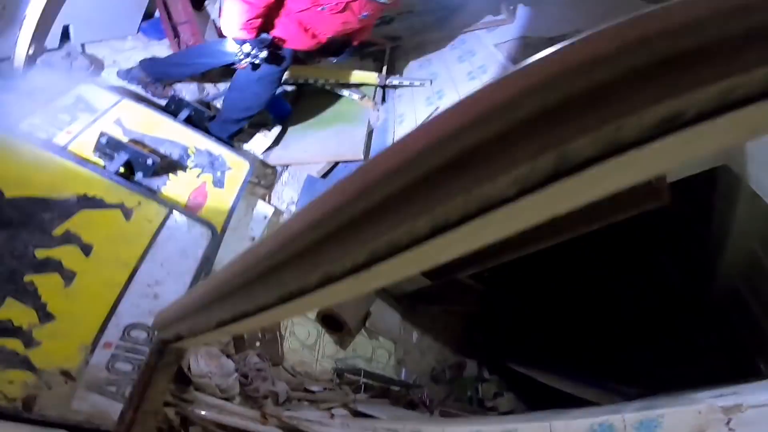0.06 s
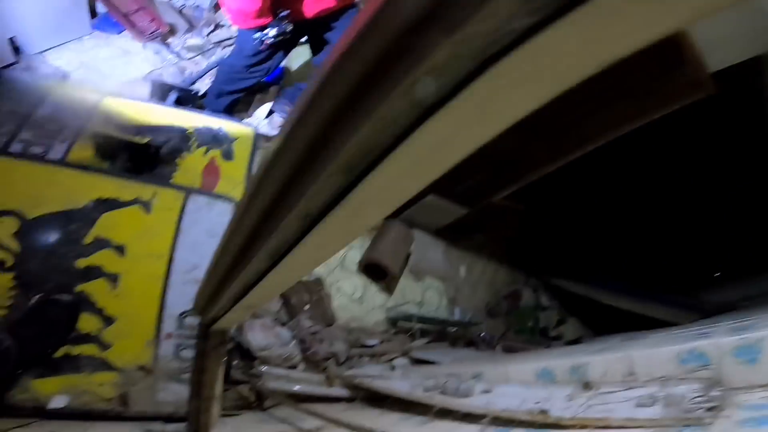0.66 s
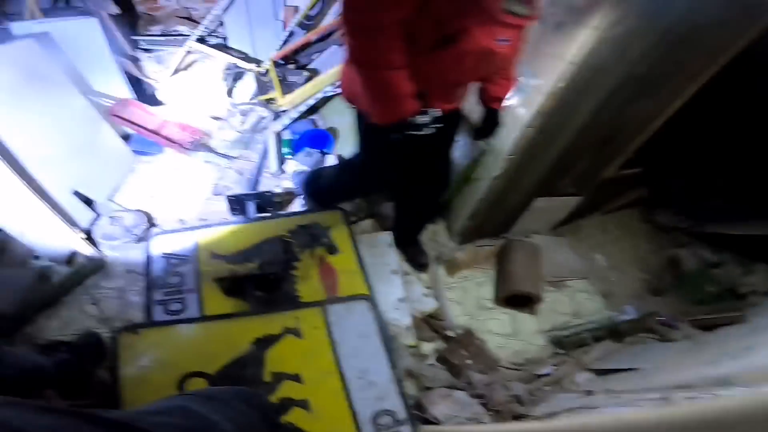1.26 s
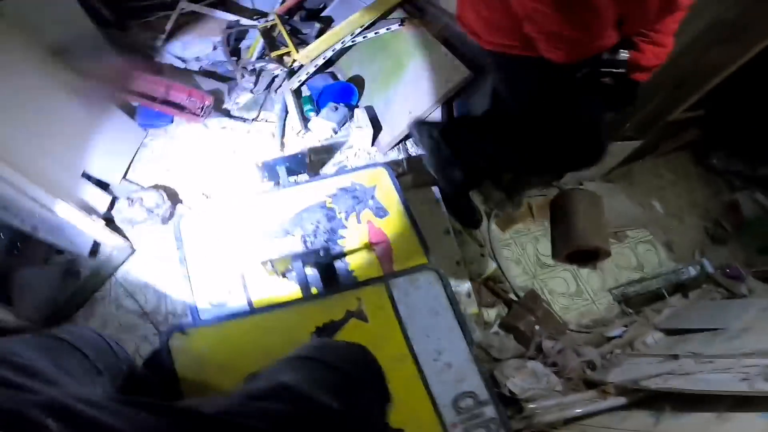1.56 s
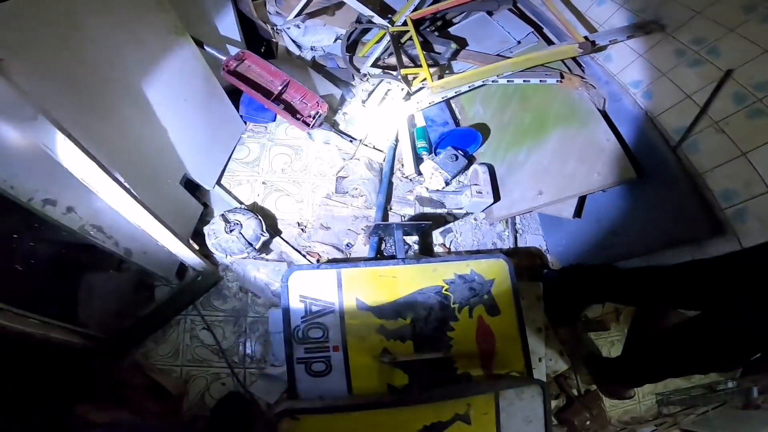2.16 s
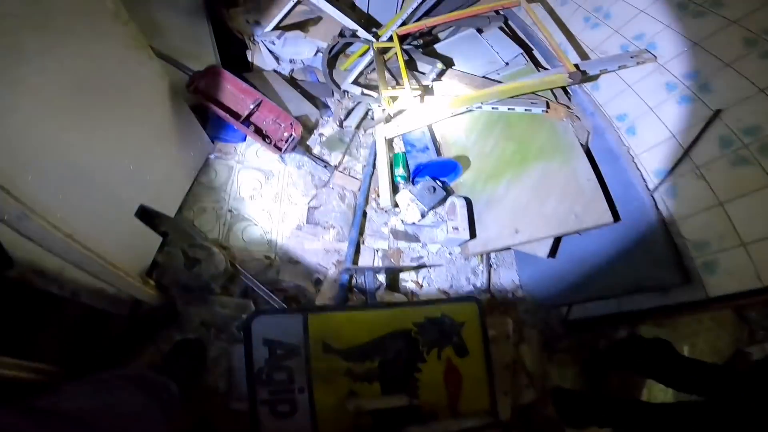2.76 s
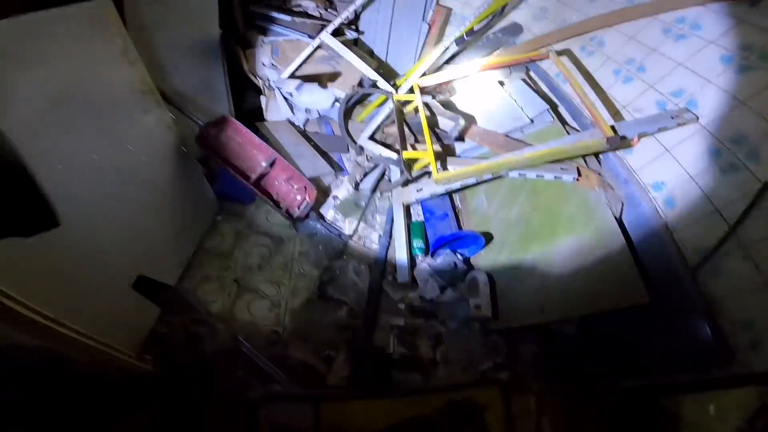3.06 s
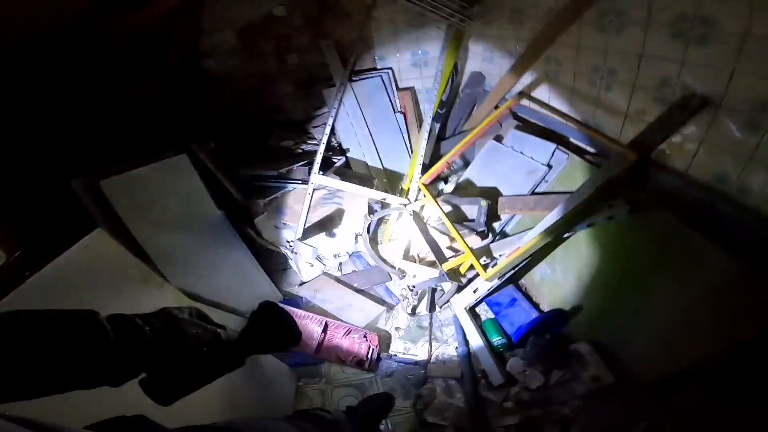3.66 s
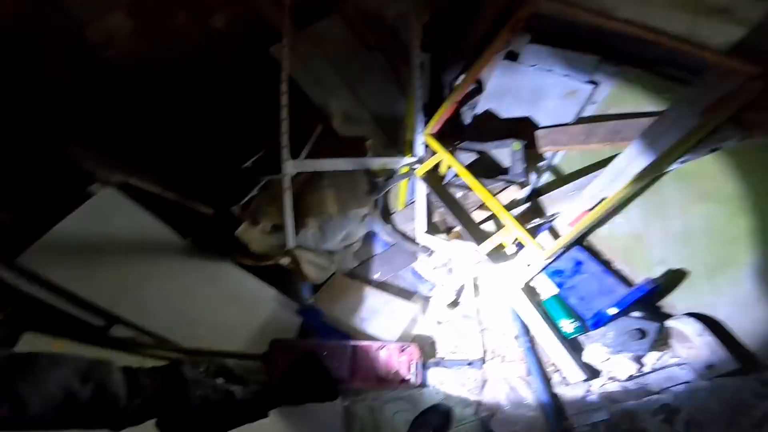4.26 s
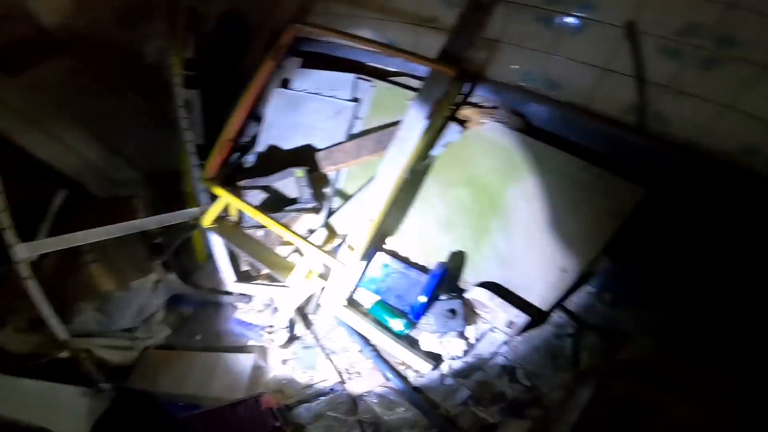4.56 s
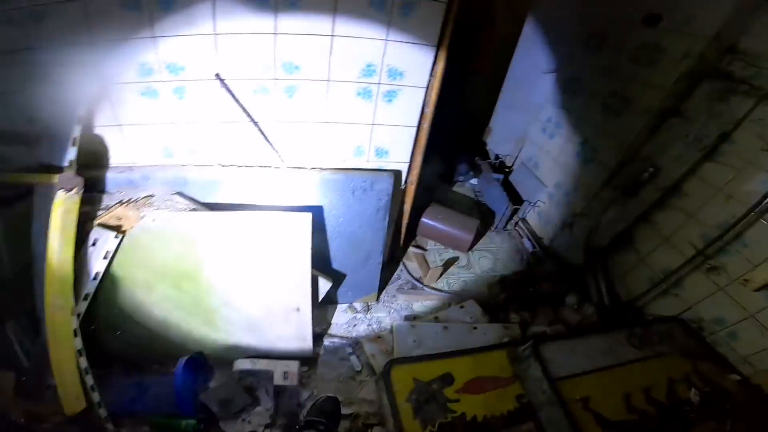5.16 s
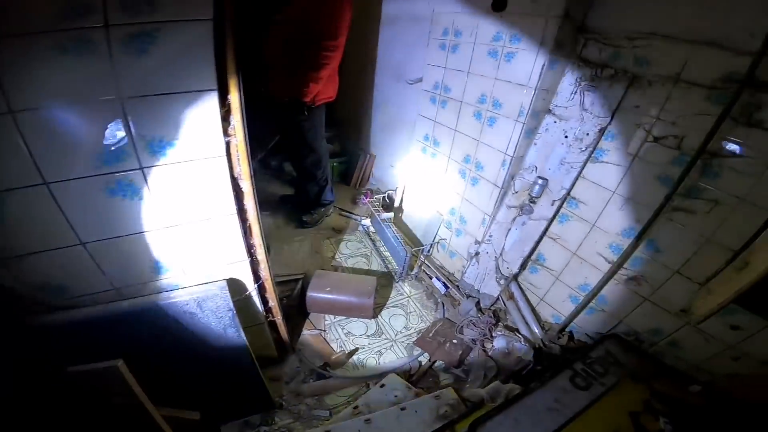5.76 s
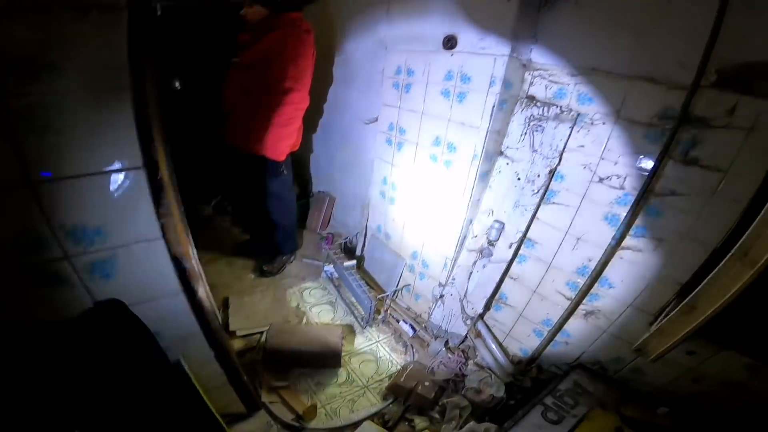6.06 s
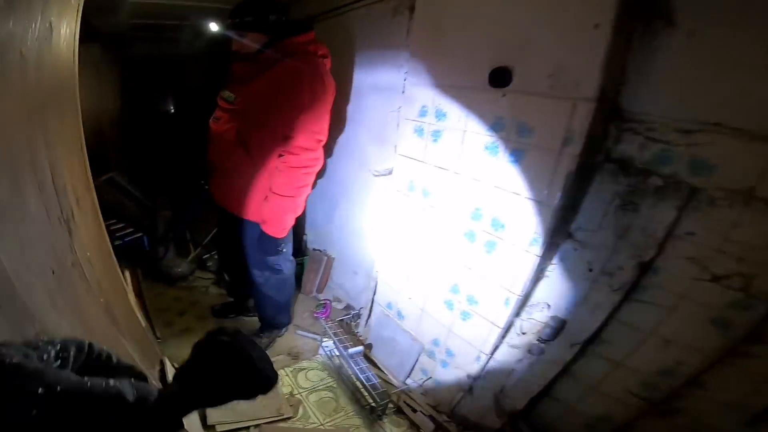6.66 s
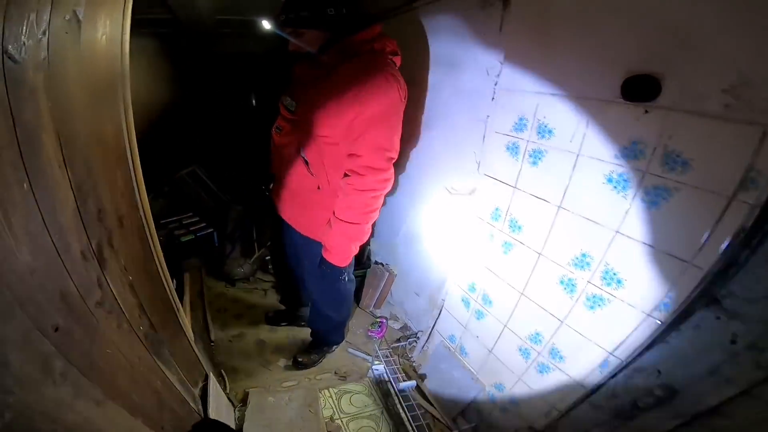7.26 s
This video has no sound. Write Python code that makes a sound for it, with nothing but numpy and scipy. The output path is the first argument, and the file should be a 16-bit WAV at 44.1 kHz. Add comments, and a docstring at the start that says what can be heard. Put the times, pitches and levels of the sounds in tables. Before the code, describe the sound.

Someone picks a way over rubbish in a small tiled room, heard from close by. Heavy steps on sheet metal come first, booming, rattling and grinding on grit. Softer knocks on boards and a swish of clothing follow. After a lull comes a quick run of loud, brittle cracks, then a short scrape and faint shuffling. The walls add a short echo.

```python
"""Someone picks a way over rubbish in a small tiled room of an abandoned building.
First, boots boom on loose sheet-metal signs, which ring and rattle while grit crunches underfoot.
From about 3 s the boots knock on boards, small bits crack and clothes swish. From 5.5 s brittle
debris snaps several times close by and the room booms faintly; then a piece scrapes along, and a
soft shuffle ends the walk. All the way through, the bare walls ring briefly over a steady hush."""
import sys
import numpy as np
from scipy import signal
from scipy.fft import rfft, irfft
from scipy.io import wavfile
from scipy.ndimage import uniform_filter1d

SR = 44100
rng = np.random.default_rng(int(sys.argv[2]) if len(sys.argv) > 2 else 0)


def to_wav(s):
    """Save 16-bit WAV."""
    ch = np.atleast_2d(s).T  # columns
    pcm = np.round(np.clip(ch, -1, 1) * 32767)  # PCM
    wavfile.write(sys.argv[1], SR, pcm.astype(np.int16))


N = 331058
T = np.arange(N) / SR
HIT = T[:SR]  # one second, the time axis of one blow

# boots landing on the metal sheets:
# (time [s], level [dB], pitch of the spot struck [Hz], rattle [dB], share of ring time left [0-1])
SHEET_STEPS = [(0.581, -7.5, 183, -6.5, 0.51), (0.598, -10, 111.5, -15, 0.7), (0.623, -8, 136, -29, 0.6),
               (0.674, -17.5, 120, -13, 0.91), (0.802, -14, 154.3, -11, 0.65),
               (0.849, -15.5, 96, -19, 0.34), (0.935, -27.5, 58.6, -8.5, 0.79),
               (0.984, -25, 127, -21, 0.89), (1.07, -28.5, 218, -22, 0.48), (1.146, -26, 157.4, -32, 0.66),
               (1.496, -30.5, 159, -7, 0.16), (1.608, -24, 120, -20, 0.52), (1.681, -8, 169.4, -27, 0.26),
               (1.6924, -16, 164, -12, 0.16), (1.738, -17.5, 125, -15, 0.35), (2.05, -25.5, 131, -6, 1),
               (2.155, -25, 148, -4, 0.4), (2.258, -23.5, 150, -5, 0.21), (2.46, -31.5, 138, -11, 0.43),
               (2.615, -36, 125, -20, 0.57)]
# the notes a sheet rings with: (pitch [Hz], level [dB], time to fade by 60 dB with no boot on it [s])
SHEET_NOTES = [(56, -6, 0.38), (78, -0.5, 0.77), (103.7, -2, 0.58), (124.4, -3, 0.38), (138.2, 2, 0.38),
               (149.8, -7.5, 0.87), (170.9, -2, 0.6), (211, -5.5, 0.59), (252.8, -7, 0.7), (351, -14, 0.98),
               (594.3, -8, 0.55), (902, -9, 0.26), (1244, -24, 0.28)]
# tone of the rattling sheet edges: (frequency [Hz], level [dB])
RATTLE_TONE = [(150, 4), (300, 4.5), (600, -4), (1400, -5), (2200, -23.5), (3800, -11.5), (6500, -50.5),
               (15000, -90)]
# brittle pieces snapping: (time [s], level [dB], pitch [Hz], sharp edge [dB], sent to the walls [dB])
DEBRIS_SNAPS = [(0.363, -38.5, 985, -9, -2), (0.5997, -14, 1290, -12, -1), (0.8233, -20.5, 2330, -2, -5),
                (1.0832, -33, 1680, 3, -4), (1.209, -40, 1170, 20, -1), (1.2921, -25, 1600, -42, 7.5),
                (1.342, -27, 2180, -19, 1), (1.349, -20, 1800, -32, 3.5), (1.392, -18.5, 2900, -8, -7),
                (1.4027, -20, 2550, -22, -20), (1.492, -31, 2570, -25, -20), (1.6747, -25.5, 1046, -6, -1),
                (1.949, -34.5, 2200, 13, -14), (2.2454, -23, 2480, 3, 2.5), (2.3342, -28.5, 1620, -2, 8),
                (2.4584, -28.5, 1480, -4, -3), (2.541, -34, 1750, -3, 1), (2.65, -44.5, 2200, 11, 10.5),
                (2.901, -24, 1450, -22, 0.5), (2.9069, -25.5, 1120, -16, 0),
                (2.9183, -22.5, 1280, -22, -17), (2.929, -27.5, 2000, 8, -14), (2.9485, -27, 2230, -19, -4),
                (2.9743, -26, 1840, 2, -1), (3.049, -27.5, 1800, -1, 1.5), (3.1303, -31.5, 1530, -11, -1),
                (3.139, -38, 1720, -23, 3.5), (3.467, -44.5, 1355, -7, 0), (3.55, -41, 2580, -31, 0),
                (3.667, -27.5, 4450, -3, -14), (3.868, -31, 2160, -9, -3.5), (4.1995, -34, 4280, 16, 2.5),
                (4.247, -39, 1210, -6, -10), (5.4993, -11.5, 5570, 2, -3), (5.5636, -21, 1480, -19, 0),
                (5.58, -20, 2010, -5, -13), (5.5874, -11.5, 1840, -17, -6), (5.6027, -16.5, 1780, -20, -8),
                (5.6633, -21, 1960, -1, -10), (5.6936, -19.5, 1810, -12, -7), (5.7112, -23, 1840, -18, -10),
                (5.732, -9, 1890, -14, -7.5), (5.8509, -9.5, 1990, -10.5, -10.5),
                (5.8586, -23, 2190, -10, -1.5), (5.9945, -20.5, 1930, -10, -7.5),
                (6.085, -20, 2380, -8, -2), (6.118, -11, 2290, -8.5, -8.5), (6.2203, -11, 2170, -11.5, -2),
                (6.255, -12.5, 2290, -9, -6), (6.3284, -26.5, 2280, -12, -33),
                (6.521, -28.5, 1430, -33, 3.5), (6.586, -25.5, 2050, -21, 1), (6.6118, -18, 2120, -8, 3.5),
                (6.616, -12, 2280, -10, -12)]
# tone of a snap's sharp edge: (frequency [Hz], level [dB])
EDGE_TONE = [(100, -29), (190, -32), (350, -21), (600, -12), (1300, 9), (3000, 10.5), (4500, 13),
             (6300, -1.5), (7700, 1), (10000, -17.5), (12500, -10.5), (16000, -15)]
# boots knocking on boards, except the last two rows, the room's low boom after a loud snap:
# (time [s], level [dB], pitch [Hz], clack against the note [dB])
DULL_THUDS = [(0.207, -46, 427, 7.5), (0.363, -44, 352, 12), (0.373, -26.5, 105, -33),
              (1.319, -36.5, 390, 8), (1.675, -28.5, 418, 8.5), (1.936, -40, 446, 12), (2.903, -42, 440, 3),
              (3.058, -45.5, 112, 9), (3.122, -48, 155, 3), (3.694, -39, 72, -9), (3.74, -35.5, 173, 5.5),
              (3.82, -33, 179, 0.5), (3.828, -28, 98, -17), (3.914, -45, 174, 4.5),
              (3.993, -42.5, 94, -3.5), (4.929, -42.5, 232, 6), (4.947, -41.5, 213, 3),
              (4.957, -41.5, 86.5, -11), (6.123, -38.5, 178, 0.5), (6.232, -39.5, 176, -12)]
# tone of a thud's clack: (frequency [Hz], level [dB])
CLACK_TONE = [(40, -38), (100, 0.5), (220, 8), (480, 3), (650, -2), (900, -13.5), (2500, -20), (12000, -80)]
# a piece is nudged, dragged and let go: (time of full weight [s], rise [s], hold [s], level [dB])
PIECE_DRAGS = [(6.525, 0.021, 0.0033, -40), (6.615, 0.031, 0.0074, -31), (6.678, 0.067, 0.088, -27),
               (6.832, 0.008, 0.0063, -37.5)]
# tone of its scrape: (frequency [Hz], level [dB])
SCRAPE_TONE = [(65, -78), (110, -29), (200, -0.5), (314, -14.5), (355, -5), (455, -14.5), (658, -4),
               (843, -9), (915, -11), (1060, -5.5), (1880, -3), (3210, -9), (4940, -9), (6870, -15.5),
               (15000, -40.5)]
# weight shifts on the sheets: (time of full weight [s], rise [s], hold [s], level [dB])
WEIGHT_SHIFTS = [(1.1, 0.16, 0.62, -46), (1.5, 0.22, 0.0055, -36.5), (1.63, 0.054, 0.24, -38.5),
                 (1.95, 0.028, 0.0041, -35.5), (2.07, 0.19, 0.29, -37), (2.255, 0.033, 0.05, -35),
                 (2.465, 0.017, 0.0051, -40), (2.62, 0.035, 0.15, -58.5)]
# tone of the sheets grinding on rubble: (frequency [Hz], level [dB])
GRIND_TONE = [(35, -13), (125, 10.5), (300, 9.5), (600, 4), (1000, 5.5), (1800, -14.5), (4000, -76)]
# a sole presses on grit: (time of full weight [s], rise [s], hold [s], level [dB], splinters [dB])
GRIT_TREADS = [(0.01, 0.11, 0.077, -43.5, -10), (0.13, 0.035, 0.029, -41, -9.5),
               (0.215, 0.048, 0.087, -41.5, -11), (0.39, .03, 0.13, -55.5, -9),
               (0.6, 0.037, 0.13, -29.5, -13), (0.815, 0.077, 0.0076, -32, -12.5),
               (1.085, 0.022, 0.01, -41, -17), (1.215, 0.072, 0.025, -45, -14),
               (1.295, 0.059, 0.15, -41, -16.5), (1.46, 0.038, 0.041, -42, -14.5),
               (1.56, 0.017, 0.027, -38, -15.5), (1.652, 0.067, 0.0069, -35.5, -12.5),
               (1.77, 0.032, 0.11, -41.5, -22), (1.95, 0.065, 0.036, -42.5, -8),
               (2.11, 0.098, 0.13, -38.5, -14), (2.25, 0.054, 0.12, -38, -14.5),
               (2.465, 0.014, 0.029, -43, -12), (2.58, 0.017, 0.022, -50.5, -11),
               (2.66, .01, 0.16, -52, -8.5), (2.905, 0.02, 0.05, -39, -8.5),
               (3.053, 0.008, 0.011, -38.5, -11), (3.315, 0.072, 0.016, -48.5, -11),
               (3.555, 0.018, 0.0098, -53.5, -11), (3.67, 0.12, 0.12, -51, -6.5),
               (3.83, 0.05, 0.0059, -40.5, -8), (3.985, 0.042, 0.01, -45, -11.5),
               (4.11, 0.15, 0.1, -57, -1), (4.2, 0.0049, 0.006, -47.5, 3), (4.247, 0.006, 0.008, -44, -22),
               (4.355, .01, 0.044, -59, 1)]
# tone of crunching grit: (frequency [Hz], level [dB])
GRIT_TONE = [(290, -21.5), (500, -6.5), (637, -3), (788, -3.5), (883, -4.5), (949, -3.5), (1330, 3),
             (1990, -2.5), (2720, -0.5), (4740, -5.5), (6480, -20), (10800, -38.5), (12800, -38),
             (15000, -45.5)]
# broken pieces rub: (time of full weight [s], rise [s], hold [s], level [dB], splinters [dB])
PIECE_RUBS = [(5.433, 0.0053, 0.0053, -59, -2), (5.5, 0.03, 0.0063, -31.5, -7.5),
              (5.585, 0.018, 0.0091, -29.5, -13.5), (5.665, 0.022, 0.0051, -48, 3.5),
              (5.735, 0.11, 0.014, -36, -14), (5.86, 0.0063, .005, -42, -20),
              (6.064, 0.014, 0.019, -40.5, -7), (6.125, 0.027, 0.0095, -33.5, -22),
              (6.255, 0.026, 0.014, -33.5, -43), (6.33, .01, 0.0054, -41, -14)]
# tone of that rubbing: (frequency [Hz], level [dB])
RUB_TONE = [(65, -42), (110, -40), (169, -4.5), (394, -11.5), (525, -7), (594, -10), (860, -10),
            (1170, -4.5), (1320, -3.5), (1630, 3.5), (1880, -2), (2260, -1), (7930, -17), (10600, -21),
            (15000, -64)]
# tone of fine splinters: (frequency [Hz], level [dB])
SPLINTER_TONE = [(2500, -51.5), (5500, 1.5), (8000, 6.5), (10500, -5), (12500, -7.5), (15500, -24.5)]
# edges rub, a squeak if the band is narrow and a scuff if it is wide; the rows at 4.83 s and 5.17 s are nylon
# clothing rustling: # (middle time [s], half length [s], pitch [Hz], filter width [Hz], level [dB])
SQUEAKS_AND_RUSTLES = [(0.032, 0.018, 745, 50, -42), (0.106, 0.033, 617, 50.4, -44),
                       (0.14, 0.045, 748, 60.4, -42.5), (0.276, 0.035, 2290, 2040, -39),
                       (0.609, 0.028, 3380, 1500, -27.5), (0.622, 0.022, 1360, 450, -31),
                       (0.688, 0.072, 4570, 1200, -33.5), (0.723, 0.019, 877, 90, -29),
                       (1.362, 0.021, 1740, 1220, -28), (2.155, 0.098, 647, 128, -33),
                       (4.235, 0.055, 11700, 4000, -50.5), (4.366, 0.027, 4180, 3500, -51.5),
                       (4.376, 0.024, 7600, 296, -42.5), (4.831, 0.07, 4370, 4500, -61),
                       (5.167, 0.17, 4130, 2930, -63.5), (6.44, 0.022, 4200, 2970, -48.5),
                       (6.715, 0.061, 914, 318, -34)]
# small hard shards clink: (time [s], pitch [Hz], level [dB], time to fade by 60 dB [s])
SHARD_CLINKS = [(2.895, 5150, -36.5, 0.2), (2.894, 13200, -50, 0.14), (5.775, 4420, -33.5, 0.12)]
# lone grains of grit tick: (time [s], level [dB])
GRIT_TICKS = [(0.689, -33), (0.965, -48.5), (1.838, -45.5), (1.985, -45), (2.039, -43.5), (2.101, -42),
              (2.198, -40), (2.498, -45), (2.828, -52), (3.034, -43), (4.215, -46.5), (4.229, -45),
              (6.679, -27), (6.831, -30.5), (7.031, -56)]
# clothes swish as the body turns: (middle time [s], half length [s], level [dB])
CLOTH_SWISHES = [(3.3, 0.58, -59.5), (4.78, 0.35, -53.5)]
# tone of the cloth: (frequency [Hz], level [dB])
CLOTH_TONE = [(59, -36), (100, -25), (134, -1), (192, 3), (535, 1), (814, -6), (1430, -2), (2750, -9.5),
              (7670, -22), (15000, -51)]
# soft shuffling further off: (middle time [s], half length [s], level [dB])
FAR_SHUFFLES = [(0.04, 0.18, -49), (0.45, 0.29, -51), (6.525, 0.032, -40.5), (7.34, 0.45, -54)]
# tone of the shuffling: (frequency [Hz], level [dB])
SHUFFLE_TONE = [(35, -28), (60, -4), (109, -28), (146, -6.5), (237, -1.5), (768, -14), (1400, -11),
                (2430, -21.5), (3500, -68)]
# the camera is jostled: (middle time [s], half length [s], level [dB])
CAMERA_JOLTS = [(3.73, 0.079, -45), (4.059, 0.068, -49.5), (4.667, 0.25, -66), (6.535, 0.029, -49)]
# tone of the building's hush: (frequency [Hz], level [dB])
HUSH_TONE = [(30, 7.5), (70, -3.5), (110, -14.5), (175, 7), (290, -2), (500, -5.5), (800, -10), (1400, -3),
             (2600, -6), (4500, -9), (7500, -19), (10000, -26.5), (15500, -32.5)]
# how long the walls ring: (frequency [Hz], time to fade by 60 dB [s])
WALL_RING = [(100, .5), (500, .42), (1400, .32), (3700, .3), (10000, .25)]
# how much the two microphone openings differ: (frequency [Hz], level against the shared sound [dB])
STEREO_SPREAD = [(2500, -81), (5000, -41.5), (9000, -34), (11000, -8.5), (15500, 3.5)]


def sheet_steps(level_db=-4, spot_octaves=0.4, elsewhere_db=-15, contact_s=0.0047,
                rattle_t60=0.5, rattle_lag_s=0.0024):
    """A boot rings a sheet, most at the pitch of the spot it hits, and damps it; the edges rattle."""
    out = np.zeros(N)
    for s, db, spot_hz, rattle_db, share in SHEET_STEPS:
        ring = np.zeros(SR)
        for hz, note_db, t60 in SHEET_NOTES:
            strength = undb(elsewhere_db) + swell(np.log2(hz / spot_hz), 0, spot_octaves)
            note = np.sin(2 * np.pi * hz * rng.normal(1, 0.0089) * HIT)
            ring += undb(note_db) * strength * fade(t60 * share) * note
        ring *= 1 - np.exp(-HIT / contact_s)
        lag = 1 - np.exp(-(HIT / rattle_lag_s) ** 2)  # the bend takes a moment to reach the edges
        rattle = colour(rng.standard_normal(SR) * fade(rattle_t60) * lag, RATTLE_TONE)
        add(out, s, undb(db + level_db) * (undb(rattle_db) * crest(rattle, 400) - crest(ring, 200)))
    return out


def snaps(level_db=-3, edge_db=2, wall_edge_db=4, rebound_cycles=3, settle_s=0.0029,
          body_q=1.9, broad_q=1.3, crumbs_per_s=380, room_hum_hz=175, size=4096):
    """A piece breaks, bounces, settles and sheds crumbs; gives the near sound and the walls' share."""
    near, walls = np.zeros(N), np.zeros(N)
    # the room's own low note, set humming by each snap
    room_hum = undb(-41) * np.sin(2 * np.pi * room_hum_hz * HIT) * fade(t60=0.22)
    for s, db, hz, sharp_db, wall_db in DEBRIS_SNAPS:
        tear = undb(-19) * rng.standard_normal(size) * fade(t60=0.021)[:size]
        tear[0] = 1  # the break itself is one click
        # the walls hear the break from all sides: a broader note and more of the sharp edge
        broad = crest(resonate_twice(tear, hz, broad_q), 64)
        broad += undb(sharp_db + edge_db + wall_edge_db) * crest(colour(tear, EDGE_TONE), 64)
        add(walls, s, undb(db + level_db + wall_db) * crest(broad, 64))
        # two more clicks: a bounce roughly in step with the piece's own note, and the settling
        tear[int(rebound_cycles / hz * SR * rng.normal(1, .05))] += undb(-1)
        tear[int(settle_s * SR * rng.uniform(.8, 1.2))] += undb(-6)
        body = crest(resonate_twice(tear, hz, body_q), 64)
        edge = undb(sharp_db + edge_db) * crest(colour(tear, EDGE_TONE), 64)
        specks = (rng.random(size) < crumbs_per_s / SR) * rng.standard_normal(size)
        crumbs = crest(resonate_twice(specks * fade(t60=0.21)[:size], hz, broad_q), 64)
        add(near, s, undb(db + level_db) * (crest(body + edge, 64) + undb(-15) * crumbs))
        add(near, s, undb(db + level_db) * room_hum)
    return near, walls


def thuds(level_db=-2, note_t60=0.12, clack_t60=0.13, rise_s=0.0014):
    """A board under a boot, or the room after a loud snap, gives a dull low note and a short clack."""
    out = np.zeros(N)
    for s, db, hz, clack_db in DULL_THUDS:
        note = np.sin(2 * np.pi * hz * HIT) * fade(note_t60) * (1 - np.exp(-HIT / rise_s))
        clack = colour(rng.standard_normal(SR) * fade(clack_t60), CLACK_TONE)
        add(out, s, undb(db + level_db) * (crest(note, 200) + undb(clack_db) * crest(clack, 200)))
    return out


def scrape():
    """A piece dragged over the rubbish makes a dense run of tiny slips."""
    slips = grains(per_s=5000, spread_db=2)
    return effort(PIECE_DRAGS, release_db_per_s=190) * unit(colour(slips, SCRAPE_TONE))


def grind(ring_db=-2, low_cut_hz=130):
    """A sheet sticks and slips on the stones beneath it; the slips rasp and keep its notes humming."""
    slips = grains(per_s=1200, spread_db=3)
    low_cut = signal.butter(2, low_cut_hz, "high", fs=SR, output="sos")
    pushes = signal.sosfilt(low_cut, slips)  # small slips barely stir the deepest notes
    ring = sum(undb(db) * resonate(pushes, hz, q=np.pi * hz * t60 / np.log(1000))
               for hz, db, t60 in SHEET_NOTES)
    rasp = unit(colour(slips, GRIND_TONE))
    return effort(WEIGHT_SHIFTS, release_db_per_s=170) * (rasp + undb(ring_db) * unit(ring))


def crumble(strokes, tone, per_s, spread_db, coarse_db, fine_db, release_db_per_s):
    """Grains break as the weight comes and goes; each has a coarse body and a fine bright splinter."""
    breaks = grains(per_s, spread_db, clump_db=2.6)
    fine_strokes = [(s, rise, hold, db + splinter_db) for s, rise, hold, db, splinter_db in strokes]
    coarse = effort(strokes, release_db_per_s) * unit(colour(breaks, tone))
    fine = effort(fine_strokes, release_db_per_s) * unit(colour(breaks, SPLINTER_TONE))
    return undb(coarse_db) * coarse + undb(fine_db) * fine


def squeaks():
    """Rubbing makes a piece sound near one pitch, swelling and dying with the stroke."""
    out = np.zeros(N)
    for s, half_s, hz, width_hz, db in SQUEAKS_AND_RUSTLES:
        stroke = swell(HIT, 2 * half_s, half_s)
        tone = resonate_twice(rng.standard_normal(SR), hz, hz / width_hz)
        add(out, s - 2 * half_s, undb(db) * crest(tone * stroke, 400))
    return out


def clinks(gap_hz=90, partner_db=-9):
    """A shard rings with two close notes that beat, and it trembles against its neighbours."""
    out = np.zeros(N)
    for s, hz, db, t60 in SHARD_CLINKS:
        partner = np.sin(2 * np.pi * ((hz + gap_hz) * HIT + rng.random()))
        ring = np.sin(2 * np.pi * hz * HIT) + undb(partner_db) * partner
        tremble = 1 + .5 * unit(resonate(rng.standard_normal(SR), gap_hz, q=1))
        add(out, s, undb(db) * crest(ring * tremble * fade(t60), 200))
    return out


def ticks():
    """A lone grain of grit bursts under a sole with a tiny bright tick."""
    out = np.zeros(N)
    for s, db in GRIT_TICKS:
        burst = rng.standard_normal(SR) * fade(t60=0.042)
        add(out, s, undb(db) * crest(resonate_twice(burst, hz=4200, q=0.9), 64))
    return out


def brush(moves, tone, per_s, spread_db):
    """Soft surfaces slide over each other: tiny catches that swell and fade with each move."""
    speed = sum(undb(db) * swell(T, s, half_s) for s, half_s, db in moves)
    return speed * unit(colour(grains(per_s, spread_db), tone))


def jolts():
    """Bumps reach the microphone through the camera body as a deep rumble."""
    push = sum(undb(db) * swell(T, s, half_s) for s, half_s, db in CAMERA_JOLTS)
    return push * unit(resonate_twice(rng.standard_normal(N), hz=48, q=5.3))


def hush(level_db=-59.5):
    """The empty building gives a faint, steady noise."""
    return undb(level_db) * unit(colour(rng.standard_normal(N), HUSH_TONE))


def room(x, build_s=0.0031):
    """Bare tiled walls throw back a blur of echoes; the high notes die first."""
    spectrum, hz = rfft(rng.standard_normal(SR)), np.arange(SR // 2 + 1)
    centres_hz = np.geomspace(60, 16000, 9)
    tail = np.zeros(SR)
    for centre, pick in zip(centres_hz, np.eye(len(centres_hz))):
        band = irfft(spectrum * np.interp(hz, centres_hz, pick), SR)
        tail += band * fade(along(centre, WALL_RING))
    tail *= 1 - np.exp(-(HIT / build_s) ** 2)
    return signal.fftconvolve(x, tail / np.sqrt(np.sum(tail ** 2)))[:N]


def microphones(mono, size=512):
    """Two close openings hear the same sound, except the highest notes, which the camera scatters."""
    scatter = irfft(np.exp(2j * np.pi * rng.random(size // 2 + 1)))
    side = colour(signal.oaconvolve(mono, scatter)[:N], STEREO_SPREAD)
    return np.array([mono + side, mono - side])


def grains(per_s, spread_db, clump_db=0, clump_s=0.012):
    """Tiny random clicks of uneven strength; clump_db bunches them into short bursts."""
    strength = undb(spread_db * np.minimum(rng.exponential(size=N), 5))
    clicks = (rng.random(N) < per_s / SR) * strength * rng.choice([-1, 1], N)
    moments = np.arange(0, N / SR, clump_s)
    clicks *= undb(clump_db * np.interp(T, moments, rng.standard_normal(len(moments))))
    nearby_power = np.abs(uniform_filter1d(clicks ** 2, size=2600))
    return clicks / np.sqrt(nearby_power + 1e-6)  # evens out slow changes in level


def effort(strokes, release_db_per_s):
    """Loudness as weight comes on, stays and eases off; overlapping strokes add their power."""
    power = np.zeros(N)
    for s, rise_s, hold_s, db, *_ in strokes:
        rising = np.clip(1 + (T - s) / rise_s, 0, 1) ** 2
        easing = undb(-release_db_per_s * np.clip(T - s - hold_s, 0, 1))
        power += (undb(db) * rising * easing) ** 2
    return np.sqrt(power)


def swell(x, middle, half_width):
    """A smooth, bell-shaped rise and fall."""
    return np.exp(-2 * np.minimum(((x - middle) / half_width) ** 2, 20))


def fade(t60):
    """The dying away of one blow: 60 dB down after t60 seconds."""
    return np.exp(-np.log(1000) * np.minimum(HIT / t60, 10))


def resonate(x, hz, q):
    """Make x ring at one pitch; a higher q rings longer."""
    return signal.lfilter(*signal.iirpeak(min(hz, SR / 3), max(q, 1), fs=SR), x)


def resonate_twice(x, hz, q):
    """Two passes, so less gets through away from the pitch."""
    return resonate(resonate(x, hz, q), hz, q)


def colour(x, tone, size=4096):
    """Filter x to follow a table of (frequency [Hz], level [dB])."""
    gains = undb(along(np.fft.rfftfreq(size, 1 / SR), tone))
    cepstrum = irfft(np.log(gains))
    cepstrum[1:size // 2] *= 2  # folded onto its first half, so nothing sounds before its cause
    cepstrum[size // 2 + 1:] = 0
    click_response = irfft(np.exp(rfft(cepstrum)))
    return signal.oaconvolve(x, click_response)[:len(x)]


def along(hz, points):
    """Read between a table's points, with octaves evenly spaced."""
    frequencies, values = np.transpose(points)
    return np.interp(np.log(hz + 1e-3), np.log(frequencies), values)


def undb(db):
    """Turn decibels into a multiplier."""
    return 10 ** (np.asarray(db) / 20)


def unit(x):
    """Scale to an average power of 1."""
    return x / np.sqrt(np.mean(x ** 2))


def crest(x, size):
    """Scale so the loudest stretch of size samples has an average power of 1."""
    return x / np.sqrt(uniform_filter1d(x ** 2, size).max())


def add(track, s, x):
    """Mix x into the track at s seconds."""
    start = max(int(s * SR), 0)
    track[start:start + len(x)] += x[:N - start]


def scene():
    """Booms, snaps and rubbing share one small room; the snaps ring its walls most."""
    booms = sheet_steps() + thuds()
    grit = crumble(GRIT_TREADS, GRIT_TONE, per_s=3500, spread_db=3.5,
                   coarse_db=-1, fine_db=-5, release_db_per_s=233.5)
    chips = crumble(GRIT_TREADS, GRIT_TONE, per_s=150, spread_db=4.5,  # larger bits crack one by one
                    coarse_db=-20.5, fine_db=-13, release_db_per_s=140)
    rub = crumble(PIECE_RUBS, RUB_TONE, per_s=3400, spread_db=3.5,
                  coarse_db=1.5, fine_db=5.5, release_db_per_s=292)
    clothes = brush(CLOTH_SWISHES, CLOTH_TONE, per_s=7800, spread_db=4)
    shuffle = brush(FAR_SHUFFLES, SHUFFLE_TONE, per_s=4000, spread_db=-0.5)
    rubbing = grit + chips + rub + clothes + shuffle
    rubbing += grind() + scrape() + squeaks() + clinks() + ticks()
    snap, snap_walls = snaps()
    echoes = room(undb(-10) * booms + undb(-13) * rubbing + undb(2) * snap_walls)
    return microphones(booms + rubbing + snap + echoes + jolts() + hush())


def record(dry, top_hz=15900):
    """The camera rounds off the loudest peaks and cuts the very highest notes."""
    high_cut = signal.ellip(8, .2, 70, top_hz, fs=SR, output="sos")
    return signal.sosfilt(high_cut, np.tanh(dry))


dry = scene()
out = record(dry)
to_wav(out)
```